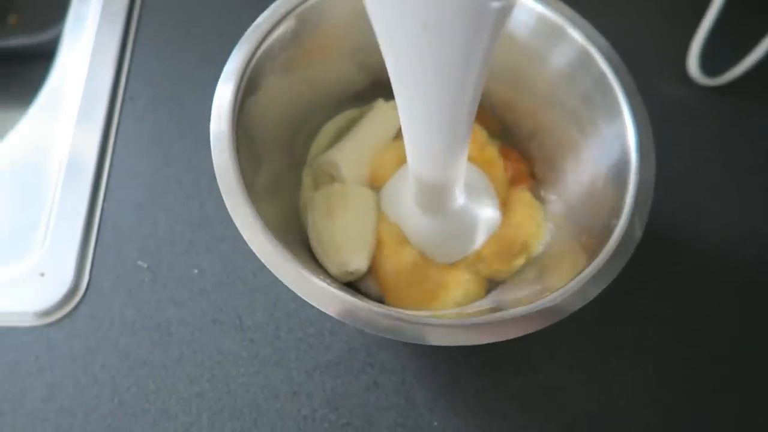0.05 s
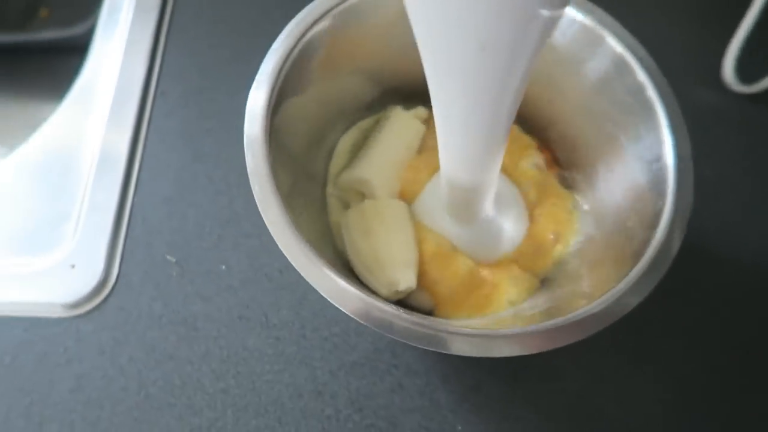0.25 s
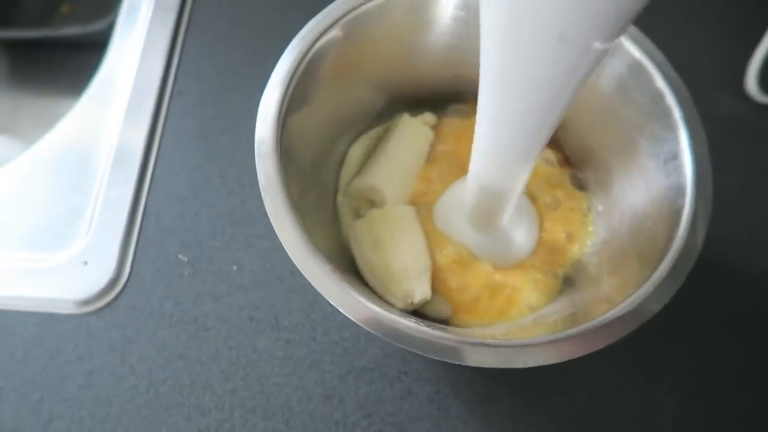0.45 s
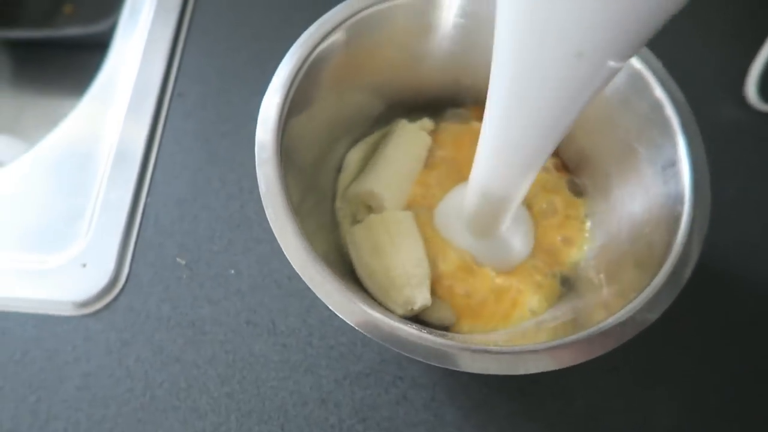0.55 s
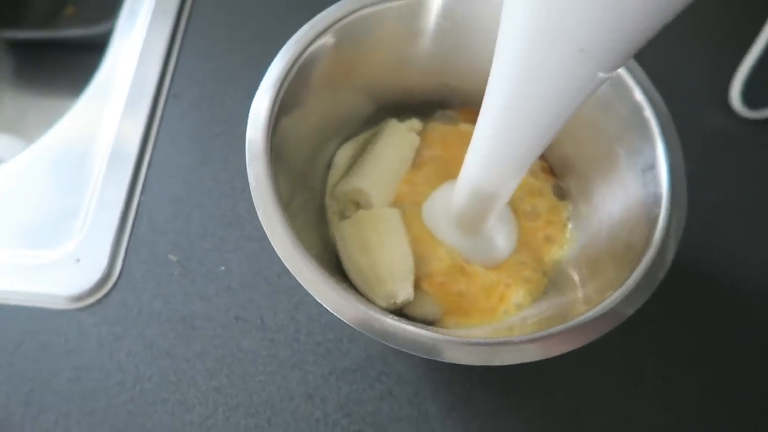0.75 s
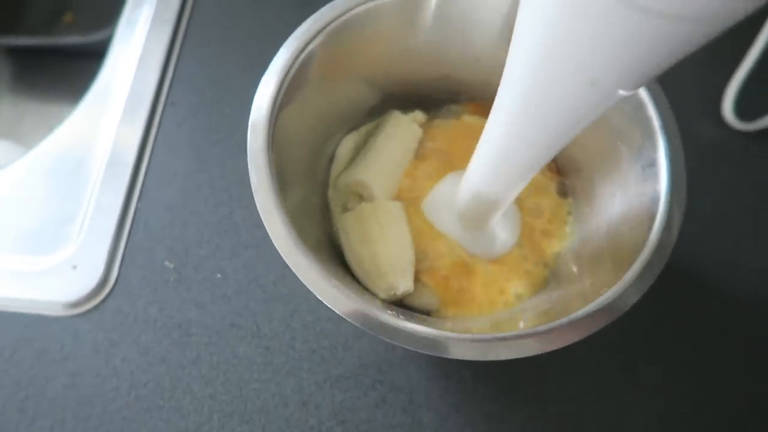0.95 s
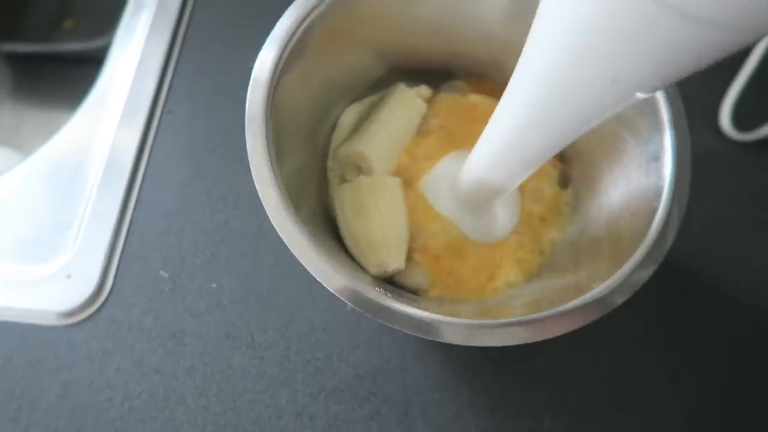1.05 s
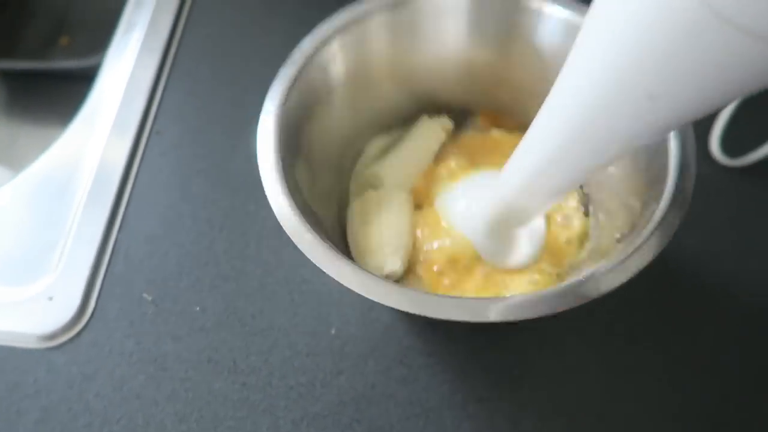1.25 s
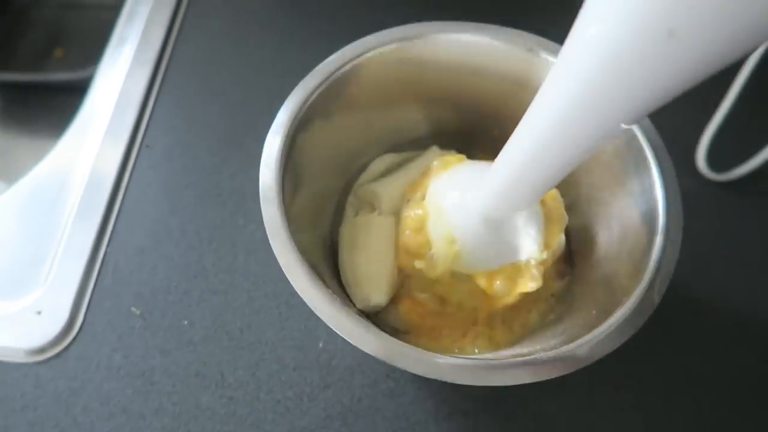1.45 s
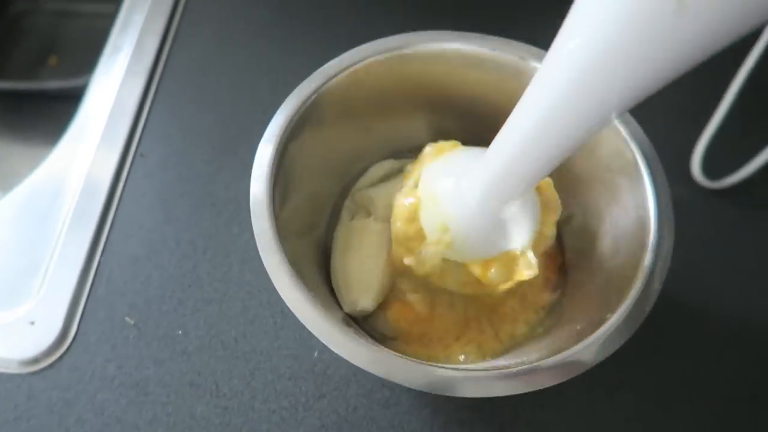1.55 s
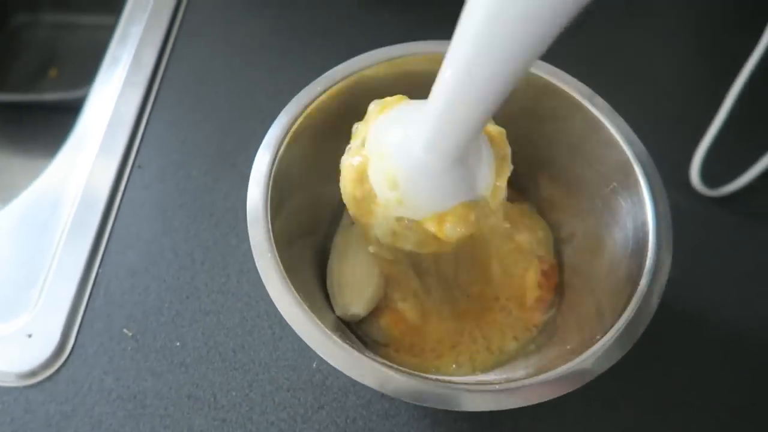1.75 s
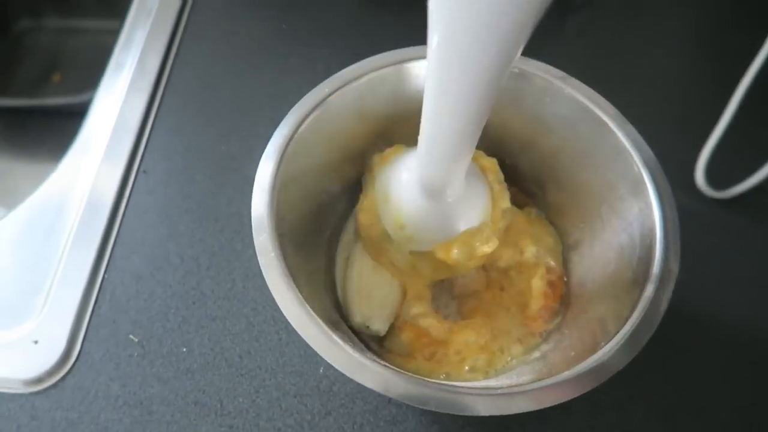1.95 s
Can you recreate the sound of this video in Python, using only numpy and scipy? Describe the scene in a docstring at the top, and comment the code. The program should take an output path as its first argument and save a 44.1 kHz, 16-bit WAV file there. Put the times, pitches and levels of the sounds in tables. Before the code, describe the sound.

A handheld blender purees soft fruit in a steel bowl, close up; its pitch sags, rises again and cuts off, then faint squelching, a loud distorted bowl knock with short rattle, and a duller bump in a small kitchen.

```python
"""Stick blender in a steel bowl

A stick blender purees fruit on a kitchen worktop, close to the microphone: sines locked to the shaft,
with noise and random splats for gears and pulp. Its motor sags under the load, recovers and is switched
off. The foot is pulled out of the sticky pulp (shaped noise, clicks, slurps), the bowl drops back with a
knock that overloads the microphone (noise thuds, ringing modes, chatter), and a duller bump follows."""
import sys
import numpy as np
from scipy import signal
from scipy.fft import rfft, irfft, next_fast_len
from scipy.io import wavfile
from scipy.ndimage import map_coordinates

SR = 44100
rng = np.random.default_rng(int(sys.argv[2]) if len(sys.argv) > 2 else 0)


def wav_record(signal):
    """Record a signal, one row per channel, as 16-bit PCM in the file named by sys.argv[1]."""
    frames = np.transpose(np.atleast_2d(signal))
    bounded = np.clip(frames, -1, 1)
    # unit amplitude maps onto the largest positive 16-bit level
    quanta = np.round(bounded * 32767).astype(np.int16)
    wavfile.write(sys.argv[1], SR, quanta)


N = 88640  # length in samples


def amp(db):
    """Decibels to gain."""
    return 10 ** (np.asarray(db) / 20)


def unit(x):
    """Scale to rms 1."""
    return x / np.sqrt(np.mean(x ** 2) + 1e-20)


def along(points, hz):
    """Read (frequency, value) points on a log frequency axis."""
    f, v = np.transpose(points)
    return np.interp(np.log(hz + 1), np.log(f + 1), v)


def curves(rows):
    """One value per sample for each column after the time; the end values hold."""
    times, *columns = np.transpose(rows)
    return [np.interp(np.arange(N) / SR, times, c) for c in columns]


def wobble(rate):
    """A smooth random curve with rate knots a second."""
    knots = rng.standard_normal(int(N * rate / SR) + 4)
    return map_coordinates(knots, [np.arange(N) * rate / SR])


def noise(*shape):
    """White noise."""
    return rng.standard_normal(shape)


def sine(cycles):
    """A sine of peak 1 from its running count of cycles."""
    return np.sin(2 * np.pi * cycles)


def swell_at(t, s, length):
    """A bell-shaped swell of peak 1 around time s."""
    return np.exp(-((t - s) / length) ** 2 / 2)


def filtered(x, response):
    """Multiply the spectrum of x by a response of frequency."""
    n = x.shape[-1]
    m = next_fast_len(n + SR // 2)
    return irfft(rfft(x, m) * response(np.fft.rfftfreq(m, 1 / SR)), m)[..., :n]


def coloured(x, spectrum):
    """Shape x by a spectrum, then scale it to rms 1."""
    return unit(filtered(x, lambda hz: amp(along(spectrum, hz))))


# stereo width of the bowl and the sounds around it: (frequency [Hz], side over middle [dB])
WIDE = [(60, -19), (130, -8.5), (300, -6.5), (650, -12.5), (1400, -14.5), (3100, -26.5), (6800, -5),
        (15000, 1)]


def spread(pair, width=WIDE):
    """Use two unrelated signals as middle and side of a stereo image."""
    side = filtered(pair[1], lambda hz: amp(along(width, hz)))
    return np.array([pair[0] + side, pair[0] - side])


def dying(x, t60):
    """Let each frequency of x fade at its own speed."""
    hz, t, grains = signal.stft(x, SR, nperseg=128)
    fade = amp(-60 * t / along(t60, hz)[:, None])
    return signal.istft(grains * fade, SR, nperseg=128)[1][..., :x.shape[-1]]


def ringing(modes, scatter_db=0):
    """Decaying sine modes with random phases and, if asked, scattered levels."""
    t = np.arange(SR // 2) / SR
    return sum(amp(db + scatter_db * rng.standard_normal() - 60 * t / t60) * sine(hz * t + rng.random())
               for hz, db, t60 in modes)


def add(track, s, sound):
    """Mix a sound into a track at time s."""
    part = track[..., round(s * SR):][..., :sound.shape[-1]]
    part += sound[..., :part.shape[-1]]


# how strongly bowl and housing radiate the shaft tones: (frequency [Hz], relative level [dB])
RADIATION = [(70, -18), (90, -6), (115, -1.5), (150, -9), (180, 0), (260, -2), (300, -2), (345, 7),
             (385, -3), (500, 3), (570, -10), (690, -4), (790, -9), (900, -2), (1000, -7), (1200, -2),
             (1450, -9), (2000, -9)]
TONE_ROUGH_DB = 1.8


def shaft_tones(turns, speed, order):
    """Every second multiple of the shaft speed from order on swells as it glides through a resonance."""
    tones = 0
    for k in range(order, 32, 2):
        level_db = along(RADIATION, k * speed) + TONE_ROUGH_DB * wobble(20.9)
        tones = tones + amp(level_db) * sine(k * turns + rng.random())
    return unit(tones)


# what the housing passes of the whine: (frequency [Hz], relative level [dB])
HOUSING = [(4100, -30), (4350, -1), (4520, 5), (4750, -2), (5800, 0), (6200, -20)]
WHINE_ORDER, WHINE_SWING = 100, .28  # multiple of the shaft speed; downward sweep, share of pitch
WHINE_WIDTH_HZ = 420
WHINE_DB, WHINE_FADE_DB_PER_S = -6, 7  # level over the gear noise at the start, and its fall


def rotor_whine(turns, speed, t):
    """The fast rotor's whine, partly steady and partly noisy, sweeps down once per turn."""
    band = filtered(noise(N), lambda hz: 1 / (1 + (hz / WHINE_WIDTH_HZ) ** 4))
    swept_speed = speed * (1 + WHINE_SWING * (.5 - turns % 1))
    carrier = sine(WHINE_ORDER * np.cumsum(swept_speed) / SR)
    whine = coloured((0.39 + unit(band)) * carrier, HOUSING)
    return amp(WHINE_DB - WHINE_FADE_DB_PER_S * t) * whine


# gear and brush noise: (frequency [Hz], relative density [dB per Hz])
GEARS = [(30, -75), (100, -24), (190, -11), (350, -3), (600, -4), (1080, 0.5), (1450, -7), (1800, -0.5),
         (2200, -7.5), (3000, -11), (4100, -15), (4500, -5), (4850, -13.5), (5500, -13), (6300, -17.5),
         (8900, -23.5), (9350, -27), (9680, -12.5), (10200, -24.5), (12600, -32.5), (13400, -33.5),
         (16000, -54)]
# stereo width of the near blender: (frequency [Hz], side over middle [dB])
NEAR = [(60, -14), (380, -4.5), (700, -23), (1300, -90), (2400, -46), (4400, -104), (8100, -18),
        (15000, 7.5)]


def gear_noise(swell):
    """Gears and brushes make broad noise that pulses with the shaft."""
    return spread(coloured(swell * noise(2, N), GEARS), NEAR)


# churning pulp: (frequency [Hz], relative density [dB per Hz])
PULP = [(60, -33), (150, -4), (400, -1.5), (700, -6.5), (1400, -5.5), (3200, -2.5), (4200, -10.5),
        (6500, -18), (9000, -19), (12500, -20), (13400, -45), (16000, -52.5)]
SPLATS_PER_S, SPLAT_SPREAD_DB = 2900, 1.5  # rate before the pulsing; scatter of sizes
PULP_LUMPS_DB, PULP_LUMPS_PER_S = 2.8, 130  # slower unevenness of the splats and its knot rate


def pulp_splats(swell):
    """Random impulses, densest as the shaft noise swells, are coloured into wet splats."""
    sizes_db = SPLAT_SPREAD_DB * noise(2, N) + PULP_LUMPS_DB * wobble(PULP_LUMPS_PER_S)
    hits = rng.random((2, N)) < swell ** 3 * SPLATS_PER_S / SR
    splats = rng.choice([-1, 1], (2, N)) * amp(sizes_db) * hits
    return spread(coloured(splats, PULP), NEAR)


# low churning that builds up as the fruit breaks: (time [s], level [dB])
CHURN = [(0, -47), (.2, -49), (.3, -32), (.38, -37), (.5, -34), (.76, -27)]
# its colour: (frequency [Hz], relative density [dB per Hz])
CHURN_COLOUR = [(30, -35), (160, -6), (350, 5.5), (700, -9), (1500, -48.5)]


def low_churn(swell):
    """Pulsing low noise of the broken fruit."""
    return amp(curves(CHURN)[0]) * coloured(swell * noise(N), CHURN_COLOUR)


# the blade bites into a lump: (time [s], length [s], level [dB])
BITES = [(.006, 0.0029, -19), (0.029, 0.017, -26), (0.31, 0.0071, -27), (0.565, 0.029, -33.5),
         (0.736, 0.0019, -28.5), (0.778, 0.0054, -35)]
# colour of the bites: (frequency [Hz], relative density [dB per Hz])
BITE = [(100, -35), (1400, -8), (1900, 0.5), (2400, -3.5), (3200, 1), (3900, -1.5), (4500, -11),
        (8000, -24), (14000, -40.5)]


def blade_bites(swell, t):
    """Each bite is a brief swell of pulsing bright noise."""
    level = sum(amp(db) * swell_at(t, s, length) for s, length, db in BITES)
    return level * coloured(swell ** 2 * noise(N), BITE)


# shaft speed before jitter: (time [s], speed [turns per second])
SPEED = [(0, 57.5), (.05, 55.6), (.12, 54.2), (.16, 52.1), (.3, 44.3), (.46, 44.2), (.53, 44.3), (.61, 47),
         (.68, 50), (.75, 55), (.8, 55)]
# running blender: (time [s], even shaft orders [dB], odd orders [dB], third-order drone in the bowl [dB],
# gear noise [dB], pulp [dB])
DRIVE = [(0, -27, -32.5, -58, -30.5, -35), (.06, -25.5, -38.5, -67, -27.5, -34),
         (.14, -28.5, -26, -90, -28.5, -39.5), (.27, -27.5, -34, -39, -27, -39),
         (.31, -26, -38, -38, -28.5, -29), (.36, -37, -34, -48.5, -27.5, -42),
         (.5, -29.5, -34, -38.5, -27.5, -36.5), (.58, -37, -49, -28.5, -27.5, -27.5),
         (.66, -26, -39, -24, -28, -26.5), (.72, -27, -35, -37, -29, -28.5),
         (.77, -30, -30.5, -34.5, -25.5, -26.5)]
SPEED_JITTER = .003  # share of the speed
GEAR_PULSING = 0.18  # depth of the noise's swell, twice a turn
MAINS_HZ, MAINS_DB = 50, -47
TONES_PAN_DB = 0.3  # left up and right down by this much
OFF_S = 0.7746  # switch-off
STOP_DB_PER_S, TONE_STOP_DB_PER_S = 482, 195  # the tones outlast the noise


def blender():
    """Motor and pulp follow one shaft; all fall quickly at switch-off."""
    t = np.arange(N) / SR
    speed = curves(SPEED)[0] * (1 + SPEED_JITTER * wobble(35))
    turns = np.cumsum(speed) / SR
    swell = 1 + GEAR_PULSING * np.cos(2 * np.pi * 2 * turns)
    even_db, odd_db, drone_db, gear_db, pulp_db = curves(DRIVE)

    tones = amp(even_db) * shaft_tones(turns, speed, order=2)
    tones = tones + amp(odd_db) * shaft_tones(turns, speed, order=5)
    tones = tones * amp(TONES_PAN_DB * np.array([[1], [-1]]))
    # the square root of two makes these levels rms
    drone = amp(drone_db) * np.sqrt(2) * sine(3 * turns)
    hum = amp(MAINS_DB) * np.sqrt(2) * sine(MAINS_HZ * t)
    gears = amp(gear_db) * (rotor_whine(turns, speed, t) + gear_noise(swell))
    pulp = amp(pulp_db) * pulp_splats(swell) + low_churn(swell) + blade_bites(swell, t)

    since_off = np.maximum(t - OFF_S, 0)
    tones = tones * amp(-TONE_STOP_DB_PER_S * since_off)
    return tones + (drone + hum + gears + pulp) * amp(-STOP_DB_PER_S * since_off)


# the foot shifting in the pulp, before flutter: (time [s], level [dB])
SHIFT = [(.78, -35.5), (.92, -45), (.99, -46.5), (1.06, -51), (1.14, -53.5), (1.22, -48), (1.29, -44.5),
         (1.35, -37), (1.39, -32), (1.5, -53), (1.66, -69.5), (1.75, -90)]
# its colour: (frequency [Hz], relative density [dB per Hz])
SMEAR = [(25, -6), (55, 9), (110, 11), (400, 7), (900, 0.5), (1000, 8.5), (1100, -0.5), (1400, -8.5),
         (2500, -5), (4500, -13), (8000, -21.5), (12000, -26), (14000, -42)]
# wet clicks of the pulp: (time [s], level [dB])
CLICKS = [(0.845, -25), (0.973, -43), (1.229, -40), (1.234, -39.5), (1.491, -44.5), (1.638, -43)]
# colour of the clicks: (frequency [Hz], relative density [dB per Hz])
CLICK_COLOUR = [(100, 0.5), (1000, 7), (3500, -5.5), (7000, -6), (12000, -11), (15000, -24.5)]
CLICK_T60_S = 0.0061


def squelch(flutter_db=1):
    """The foot drags through the pulp as fluttering noise, with a few wet clicks of decaying noise."""
    drag = spread(coloured(noise(2, N), SMEAR))
    out = amp(curves(SHIFT)[0] + flutter_db * wobble(70)) * drag
    t = np.arange(SR // 10) / SR
    for s, db in CLICKS:
        click = spread(coloured(noise(2, len(t)), CLICK_COLOUR))
        add(out, s, amp(db - 60 * t / CLICK_T60_S) * click)
    return out


# quiet kitchen: (frequency [Hz], relative density [dB per Hz])
FLOOR = [(25, 8.5), (60, -3.5), (130, 1), (300, -4), (1000, -14), (2000, -18.5), (6000, -26), (12000, -37),
         (14000, -57)]
FLOOR_DB = -58


def quiet_kitchen():
    """Steady faint noise, strongest in the bass."""
    return amp(FLOOR_DB) * spread(coloured(noise(2, N), FLOOR))


# decay of the room: (frequency [Hz], t60 [s])
ROOM_T60 = [(100, 0.28), (300, .45), (1000, 0.38), (3000, 0.39), (6000, 0.25), (12000, 0.14)]
# colour of the room: (frequency [Hz], relative level [dB])
ROOM_COLOUR = [(40, -22), (100, -6), (200, 3), (500, 0.5), (1000, 1.5), (1700, -1), (2700, 0), (5000, -5),
               (12000, -2.5)]
# stereo width of the room: (frequency [Hz], side over middle [dB])
ROOM_WIDTH = [(60, -18.5), (300, -14), (1400, -17), (4000, -29.5), (7000, -1.5), (15000, -6.5)]


def kitchen(x, delay_s=.006):
    """A small hard room answers with a short tail of decaying noise."""
    tail = dying(coloured(noise(2, SR // 2), ROOM_COLOUR), ROOM_T60)
    tail = tail / np.linalg.norm(tail[0])
    tail = np.pad(tail, ((0, 0), (round(delay_s * SR), 0)))
    echoes = signal.fftconvolve(x.mean(axis=0)[None], tail, axes=1)[:, :N]
    return spread(echoes, ROOM_WIDTH)


# low resonances ringing on after switch-off: (frequency [Hz], level [dB], t60 [s])
AFTER_RING = [(225, -32.5, 0.61), (352, -34.5, 0.48)]


def after_ring():
    """Low modes ring on when the motor is switched off."""
    out = np.zeros(N)
    add(out, OFF_S, ringing(AFTER_RING))
    return out


# slurps as air is drawn under the foot: (time [s], length [s], level [dB], centre [Hz])
SLURPS = [(0.945, 0.038, -50, 2340), (1.345, 0.0073, -44, 3270)]
SLURP_WIDTH = 0.22  # share of the centre frequency


def slurps():
    """Air drawn under the foot gives short swells of narrow hiss."""
    out, t = np.zeros(N), np.arange(N) / SR
    for s, length, db, centre in SLURPS:
        hiss = unit(filtered(noise(N), lambda hz: 1 / (1 + ((hz / centre - 1) / SLURP_WIDTH) ** 2)))
        out += amp(db) * swell_at(t, s, length) * hiss
    return out


# soft bumps of the foot and of falling pulp: (time [s], level before the attack [dB], pitch [Hz])
BUMPS = [(.975, -35, 140), (1.321, -32.5, 290), (1.347, -15, 264.6), (1.365, -14.5, 312.4),
         (1.513, -14, 268.4), (1.547, -22.5, 371), (1.573, -28, 200.3), (1.64, -34, 314.6),
         (1.84, -50, 254), (1.992, -23, 285), (2.003, -11, 265)]
BUMP_ATTACK_S, BUMP_T60_S = 0.0037, 0.051


def bumps():
    """A soft contact gives a short low sine thump with a rounded attack."""
    out, t = np.zeros(N), np.arange(SR // 4) / SR
    attack = 1 - np.exp(-t / BUMP_ATTACK_S)
    for s, db, hz in BUMPS:
        add(out, s, amp(db - 60 * t / BUMP_T60_S) * attack * sine(hz * t))
    return out


# contacts of foot, bowl and worktop: (time [s], level [dB], brightness [Hz])
KNOCKS = [(1.317, -29, 900), (1.34, -28, 1985), (1.362, -15.5, 2203), (1.367, -17.5, 1994),
          (1.399, -14, 4000), (1.4043, 11.5, 2220), (1.409, 1, 1500), (1.512, -26.5, 2007)]
# damped thud of a contact: (frequency [Hz], relative density [dB per Hz])
THUD = [(25, -22.5), (100, -13.5), (190, 5.5), (700, 1.5), (1000, 5.5), (1400, -7.5), (2700, -6.5),
        (5000, -23.5), (10000, -25), (16000, -38)]
# its decay: (frequency [Hz], t60 [s])
THUD_T60 = [(100, 0.028), (1000, 0.026), (4000, 0.026), (12000, 0.057)]
# modes of the bowl and the blender's foot, before scatter: (frequency [Hz], relative level [dB], t60 [s])
BOWL = [(221, -34, .33), (301, -32, .35), (358, -26, .22), (495, -12, .17), (574.5, -33.5, 0.2),
        (624, -40, 0.47), (710, -5, .022), (727, -33, .35), (902, -2, 0.035), (995, -30, .17),
        (1170, -27, .22), (1340, -36, .21), (1648, -32.5, .3), (1809, -30.5, .25), (2076, -33.5, 0.18),
        (2643, -36, .25), (4490, -5, 0.019)]
RING_DB = -8  # all modes against the thud


def knocks(scatter_db=1.0):
    """Each contact thuds and rings the bowl; soft contacts lose their treble."""
    out = np.zeros((2, N))
    for s, db, bright_hz in KNOCKS:
        thud = spread(dying(coloured(noise(2, SR // 2), THUD), THUD_T60))
        ring = amp(RING_DB) * ringing(BOWL, scatter_db)
        softness = signal.butter(1, bright_hz, fs=SR)
        add(out, s, amp(db) * signal.lfilter(*softness, thud + ring))
    return out


# the bowl chatters on the worktop as it settles: (frequency [Hz], relative density [dB per Hz])
CHATTER = [(40, -24.5), (130, -5), (380, 1.5), (510, 0), (600, 2.5), (900, -1), (1220, -4.5), (1400, -6),
           (1700, -8.5), (2700, -19.5), (3600, -27), (8000, -46), (14000, -59)]
CHATTER_S, CHATTER_DB, CHATTER_DB_PER_S = 1.412, -20, 146.5  # start, level and fall


def chatter(rough_db=2.5):
    """A dense, uneven rattle of noise dies away after the knock."""
    age = np.arange(N) / SR - CHATTER_S
    level_db = CHATTER_DB - CHATTER_DB_PER_S * np.abs(age) + rough_db * wobble(140)
    rattle = spread(coloured(noise(2, N), CHATTER), ROOM_WIDTH)
    return (age > 0) * amp(level_db) * rattle


def crack(db=-3, t60=0.057):
    """The brief broad noise of a tap."""
    t = np.arange(SR // 2) / SR
    return amp(db - 60 * t / t60) * coloured(noise(len(t)), THUD)


# the plastic foot taps the bowl: (time [s], level [dB])
TAPS = [(1.974, -42.5), (1.986, -37.5), (1.993, -35)]
# modes of the foot: (frequency [Hz], relative level [dB], t60 [s])
FOOT = [(620, -4, .02), (2700, -8, .015), (4400, -8, .035)]


def foot_taps():
    """Each tap cracks and briefly rings the foot."""
    out = np.zeros(N)
    for s, db in TAPS:
        add(out, s, amp(db) * (ringing(FOOT) + crack()))
    return out


ROOM_DB, KNOCK_ROOM_DB = -23.5, -22.5  # room level for the work and for the knocks


def scene():
    """Blender, pulp and bowl in the kitchen."""
    work = blender() + squelch() + after_ring() + slurps() + bumps() + chatter() + foot_taps()
    hits = knocks()
    room = kitchen(amp(ROOM_DB) * work + amp(KNOCK_ROOM_DB) * hits)
    return work + hits + room + quiet_kitchen()


CLIP_TOP, TOP_HZ = 1, 15900  # overload level (full scale 1) and band limit


def record(dry):
    """The microphone clips on the loud knock and keeps nothing above its band limit."""
    clipped = np.clip(dry, -CLIP_TOP, CLIP_TOP)
    return filtered(clipped, lambda hz: hz < TOP_HZ)


dry = scene()
out = record(dry)
wav_record(out)
```